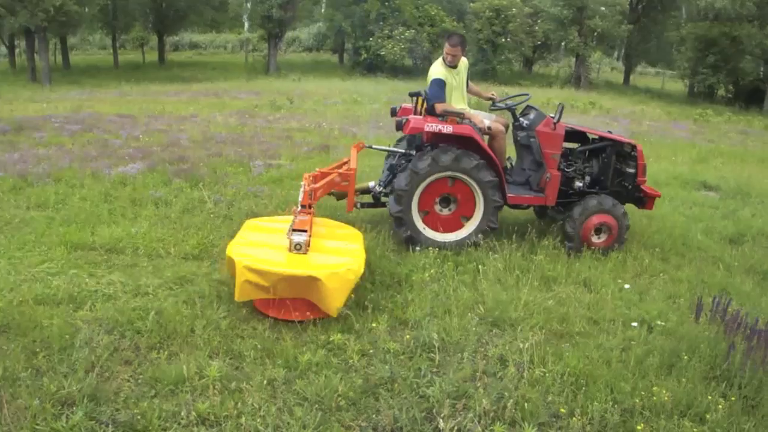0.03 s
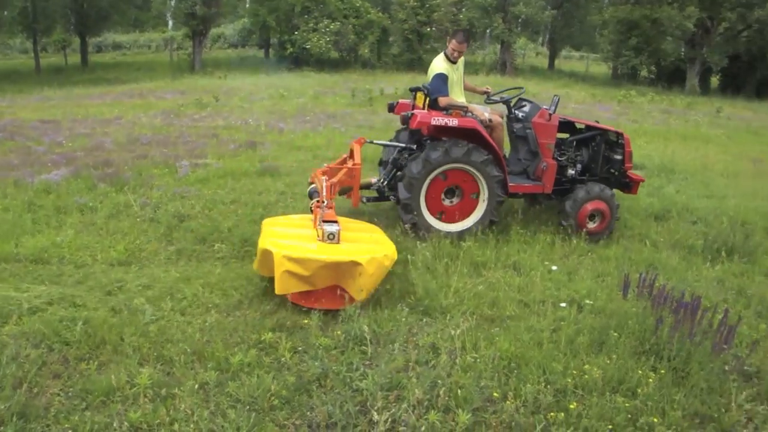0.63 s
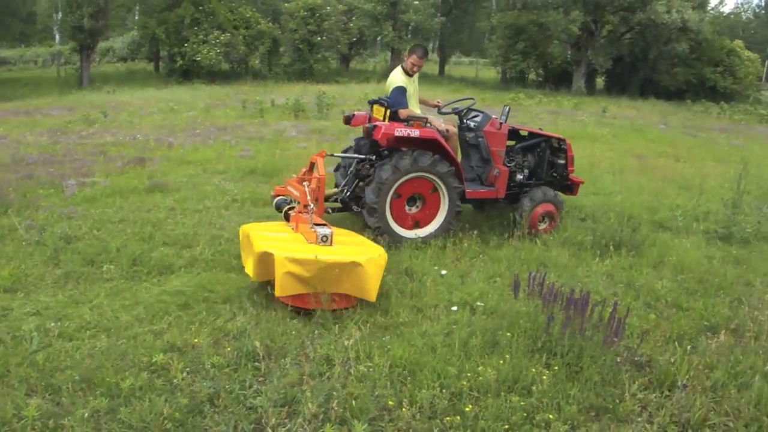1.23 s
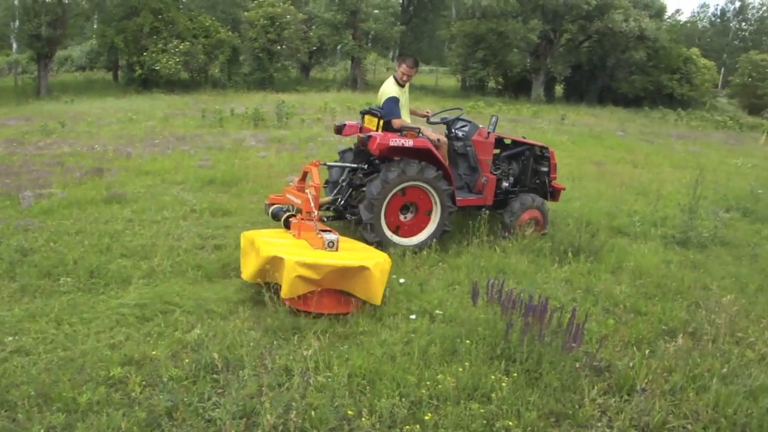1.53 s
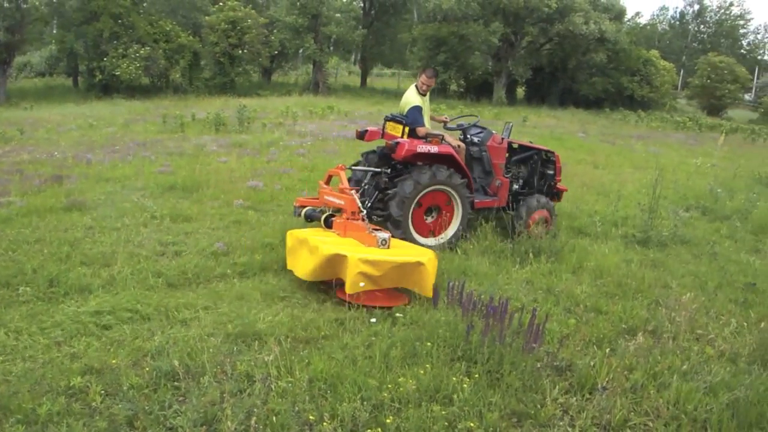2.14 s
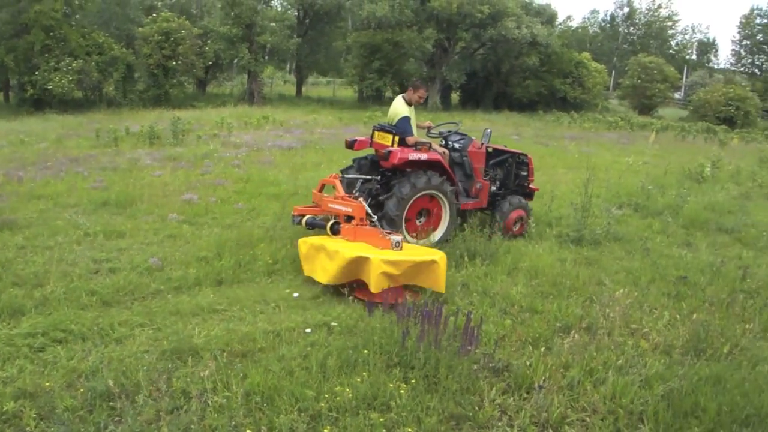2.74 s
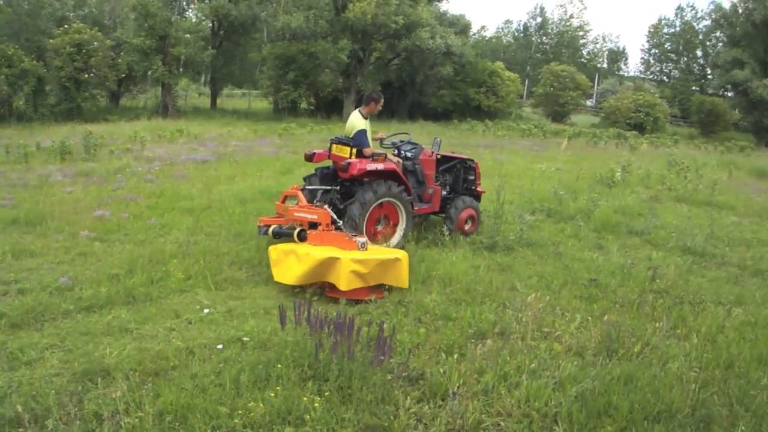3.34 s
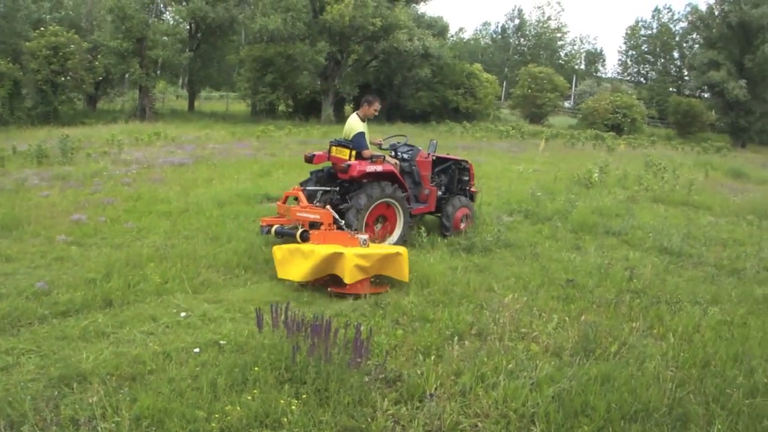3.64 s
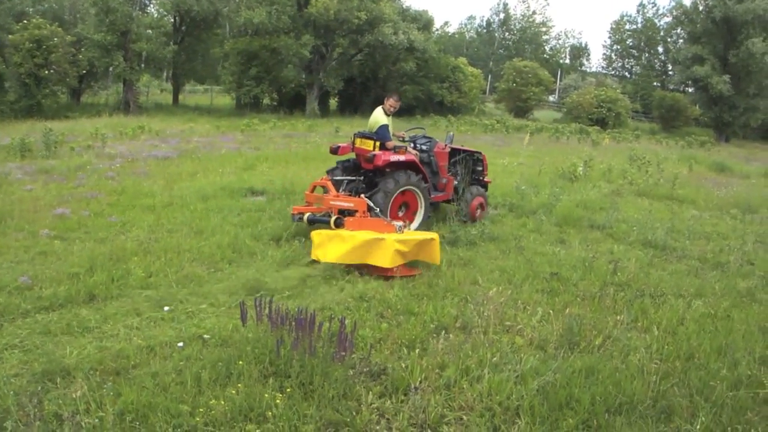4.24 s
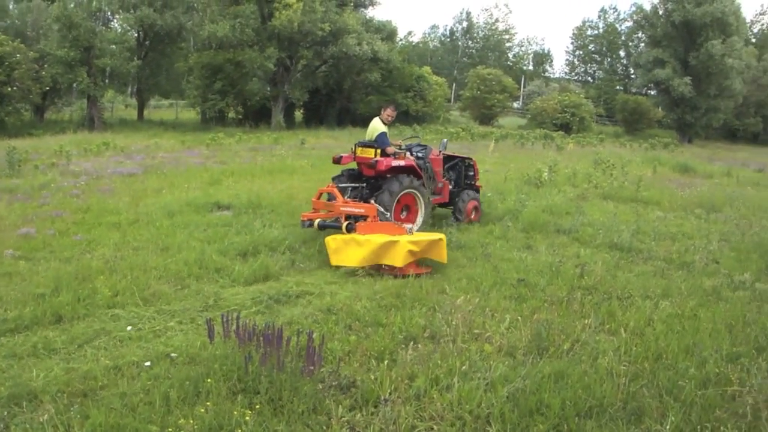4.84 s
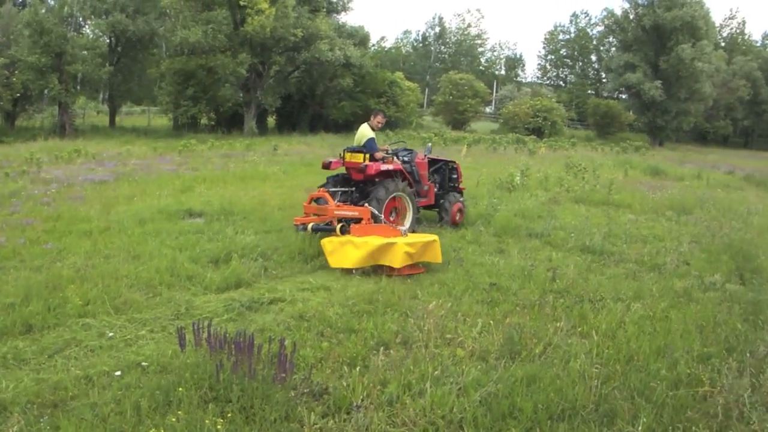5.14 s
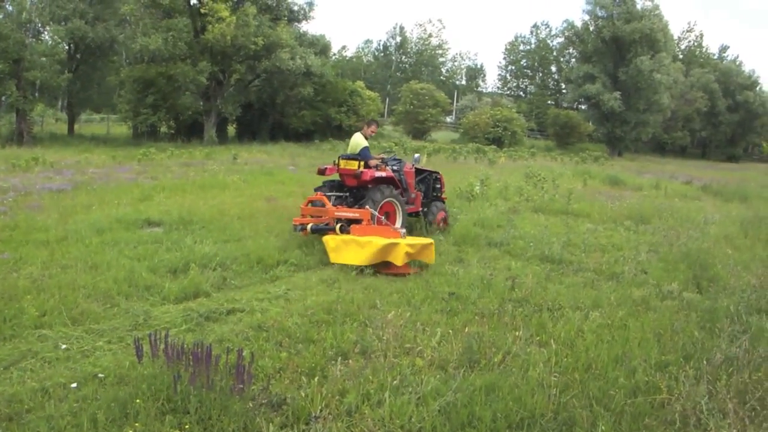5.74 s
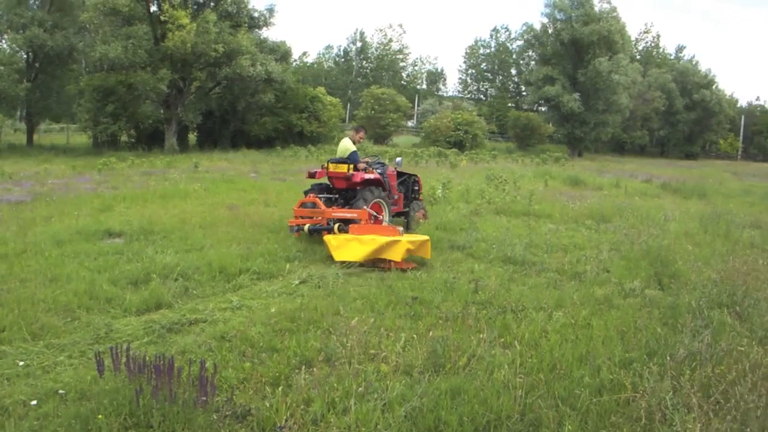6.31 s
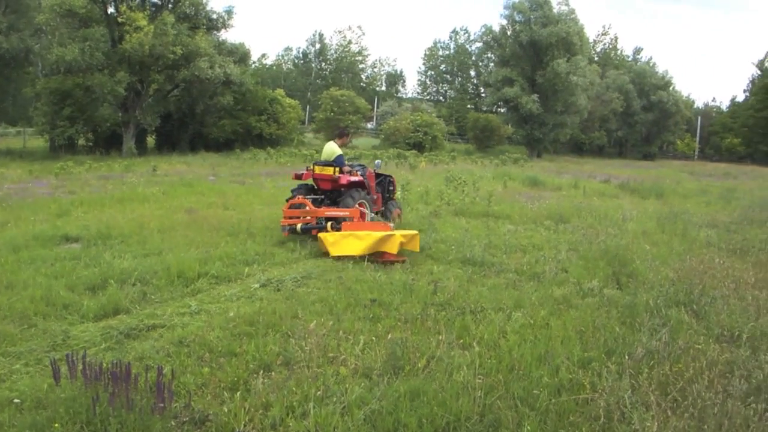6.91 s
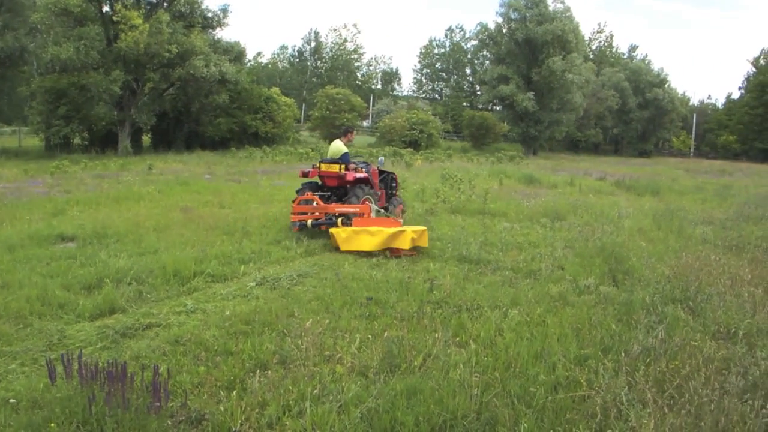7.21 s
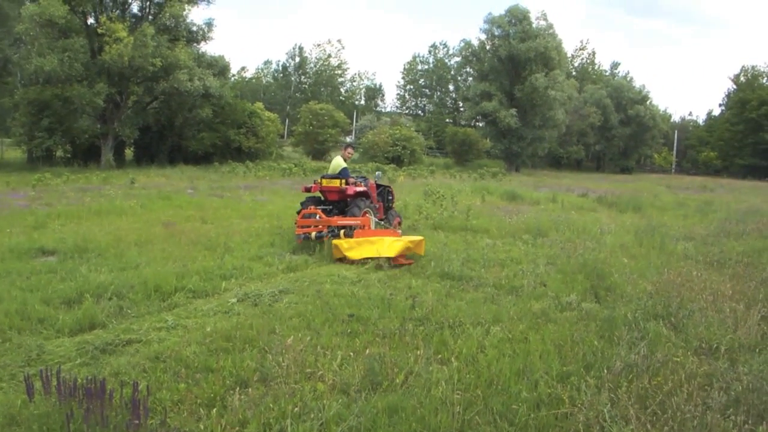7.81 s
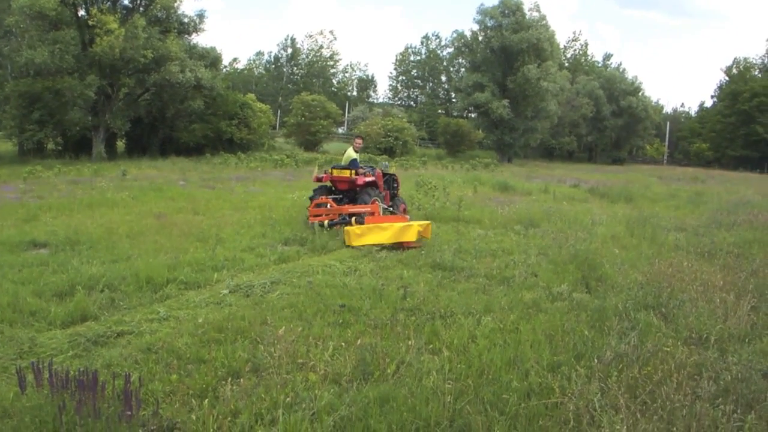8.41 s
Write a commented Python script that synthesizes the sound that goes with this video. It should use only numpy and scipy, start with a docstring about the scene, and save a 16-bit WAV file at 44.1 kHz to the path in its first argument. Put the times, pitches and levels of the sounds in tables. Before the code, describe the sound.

A small diesel tractor is heard mowing a meadow from the start, its knocking clatter holding a steady speed for about eight and a half seconds. Beneath it are a low exhaust hum, whining gears and the roar of a drum mower swishing through grass. Thick clumps add brief rasps in the first two seconds, then around 3.7, 4.5 and 6.7 seconds and from 7 to 8 seconds. Between about 1.5 and 2.3 seconds, grit strikes the blades in a cluster of tiny, sharp metallic ticks. Single faint ticks follow now and then, with a few more near 8 seconds. The engine's tone shifts as the tractor turns, at around 1.5 seconds and again at 4 seconds, where the clatter dips briefly as its rear swings toward the listener. It then recovers, and engine and mower keep running to the end.

```python
"""The clatter of a small three-cylinder diesel tractor comes first, heard side on as it mows a meadow.
Combustion knock excites the resonances of its block and panels, and the timbre shifts as it turns its
tail to the listener. Under the clatter the exhaust hums, gears whine, and a drum mower roars and shreds
grass. Thick clumps rasp and load the drive. Now and then grit sets a blade ringing, and the sharpest
of these ticks make a gain control duck."""
import sys
import numpy as np
from scipy.fft import rfft, irfft, next_fast_len
from scipy.io import wavfile
from scipy.ndimage import uniform_filter1d, map_coordinates

SR = 44100
rng = np.random.default_rng(int(sys.argv[2]) if len(sys.argv) > 2 else 0)


def persist_wave(psi):
    """Save psi, clipped to +-1, as 16-bit WAV."""
    counts = np.round(np.clip(psi, -1, 1) * 32767).astype(np.int16)
    wavfile.write(sys.argv[1], SR, np.atleast_2d(counts).T)


N = 373086

# Engine speed. Each row: time in seconds, firings per second.
FIRING_RATE = [(0, 49.16), (2.7, 49.1), (4.3, 48.8), (5.4, 48.8), (6.2, 49.05), (8.46, 49.05)]
# The tractor's turn. Each row: time in seconds, heading (0 side on, 1 three-quarter, 2 tail on),
# delay of the reflection from the mower deck in ms.
TURN = [(0, 0.095, 0.17), (1.2, 0.018, .19), (1.6, 1, 0.21), (3.75, 1, 0.22), (4.1, 1.82, 0.24),
        (6.5, 1.95, 0.23), (8.46, 2.01, .247)]
# Exhaust tones. Each row: harmonic number of the four-stroke cycle, relative level in dB.
EXHAUST_HARMONICS = [(3, -82), (6, -70.5), (7, -70), (8, -70), (9, -54.5), (12, -60), (15, -59),
                     (18, -57.5)]
# Gear and bearing tones. Each row: frequency in Hz, relative level in dB at headings 0, 1 and 2.
GEAR_TONES = [(252, -58, -58, -52), (369, -42.5, -42, -53), (752, -51, -49, -44), (1141, -50, -43, -39),
              (1340, -44, -42, -37.5), (1598, -50, -37.5, -55), (1674, -32, -50, -40),
              (1757, -39, -50, -50), (1940, -52, -50, -43), (2102, -39, -44, -47), (2256, -41, -36, -44),
              (2602, -44, -50, -46)]
# Brief swells of the gear tones. Each row: centre in seconds, rise in dB, half length in seconds.
GEAR_SURGES = [(.36, 5, 0.038), (0.855, 2, 0.11)]
# Modes of a struck blade. Each row: frequency in Hz, relative level in dB, 60 dB decay time in seconds.
BLADE_MODES = [(3700, -23, .01), (6840, -10, 0.0065), (8300, -8.5, 0.0058), (10050, -7.5, 0.0057),
               (14200, -0.5, 0.0011)]
# Grit striking the blades. Each row: start in seconds, relative level in dB.
GRIT_HITS = [(1.4554, -9.5), (1.5207, -12), (1.5835, -12), (1.7586, -18), (1.9685, -9.5), (2.0075, -12),
             (2.126, -13.5), (2.2615, -10), (3.2127, -19), (4.1359, -15), (4.5723, -15), (6.0615, -17),
             (6.663, -16), (7.914, -15), (8.235, -11), (8.2841, -13)]
# Thick clumps and woody stalks. Each row: centre in seconds, rasp level in dB, load in dB,
# half length in seconds.
GRASS_CLUMPS = [(.24, -32, 0.2, .078), (0.413, -40, 2.5, .04), (0.74, -28, 0, .018),
                (1.33, -25.5, -0.5, .011), (1.536, -29, 1.5, 0.016), (1.892, -38, 1.5, .03),
                (3.695, -30.5, .5, .05), (4.52, -29, 1, .025), (5.063, -20, .1, .002),
                (5.32, -34, 3, 0.062), (6.686, -27, .5, 0.031), (7.274, -31, -0.1, 0.29),
                (7.526, -28, 0, .035), (8.103, -30, .2, 0.12)]
# Resonances of block and panels. Each row: centre in Hz, width in Hz, gain in dB at headings 0, 1 and 2.
PANEL_MODES = [(481, 63, -8, -0.5, 1), (671, 80, 0, 2.5, 2.5), (854, 98, 1.5, 2.5, -7),
               (944, 76, -1.5, -8, -5), (1030, 24, -3, 2.5, 5), (1157, 77, 3.5, 5, 5.5),
               (1330, 163, 7, 6, 7), (1573, 70, 2.5, 7, -6), (1663, 67, 11, 5, 4), (1880, 83, 1.5, -3, 3),
               (2074, 160, 4, 4.5, -0.5), (2270, 130, 3.5, 4, -1), (2560, 530, 6.5, 2.5, 1),
               (3190, 230, 1.5, 3.5, 5.5)]
# Spectra of the five noises. Each row: frequency in Hz, relative spectral density in dB.
RASP_SPECTRUM = [(1500, -20.5), (2800, -4), (3150, 6.5), (3400, 2), (3700, 6), (4500, -7.5), (6000, -24),
                 (11000, -30)]
SWISH_SPECTRUM = [(1000, -29), (2500, -2.5), (3700, 3), (5200, 0), (7000, -4.5), (8300, -2.5), (9100, -7.5),
                  (10500, -1.5), (14000, -63)]
SNAP_SPECTRUM = [(2000, -32), (5000, 1.5), (7000, 1.5), (8300, 7.5), (9300, 5), (10500, 0), (14000, 1.5)]
ROAR_SPECTRUM = [(25, -70), (55, -44), (80, -46), (130, -19), (200, -12.5), (290, -6), (400, -3.5),
                 (620, 0.5), (950, 2.5), (1400, -7.5), (3000, -23), (8000, -53)]
KNOCK_SPECTRUM = [(300, -69), (800, -7.5), (1250, -3), (1900, 1), (2600, -2.5), (2950, -6.5), (4000, -10),
                  (6000, -21.5), (11000, -27.5)]
# Slow swells of the cutting and of the turning engine. Each row: time in seconds, relative level in dB.
CUTTING_SWELL = [(0.2, -31), (0.65, -31.5), (1.1, -32.0), (3.15, -33.0), (3.65, -30.0), (4.05, -30.5),
                 (4.4, -33.0), (5.5, -31.0), (6.3, -32.5), (7.1, -33), (7.45, -29.5), (8.44, -33.5)]
ENGINE_SWELL = [(0.2, -22), (0.85, -22), (1.5, -23.5), (2.4, -24.5), (3.1, -22.5), (3.8, -24.0),
                (4.2, -28.5), (4.7, -25.5), (5.05, -26), (6.3, -25), (6.8, -24), (7.65, -24.5), (8.05, -23),
                (8.44, -23.5)]

EXHAUST_TRIM_DB, ROAR_BASE_DB = (-2.5, -3, 0), (-31, -29.5, -29)  # at headings 0, 1 and 2
PATCHY_DB, PATCHY_PER_S = 0.55, 7  # patchy grass varies the load
CLATTER_PER_LOAD, ROAR_PER_LOAD, CUT_PER_LOAD = 0.79, 0.92, 0.82  # dB for each dB of load
ROAR_PER_SWELL, WHINE_PER_SWELL = 0.66, 0.3  # dB for each dB of the engine's swell


def amp(db):
    """Amplitude grows tenfold for every 20 dB."""
    return 10 ** (np.asarray(db) / 20)


def unit(x):
    """Normalisation to an rms of 1."""
    return x / np.sqrt(np.mean(x ** 2) + 1e-20)


def seconds():
    """The instants of uniform sampling."""
    return np.arange(N) / SR


def curves(rows):
    """Linear interpolation in time of each column after the first."""
    times, *columns = np.transpose(rows)
    return [np.interp(seconds(), times, column) for column in columns]


def bump(centre_s, half_s):
    """A Gaussian pulse of height 1."""
    return np.exp(-((seconds() - centre_s) / half_s) ** 2)


def wobble(per_s):
    """Slow noise of rms 1: a spline through per_s random values a second."""
    knots = rng.standard_normal(int(N * per_s / SR) + 4)
    return unit(map_coordinates(knots, [seconds() * per_s], mode="nearest"))


def throb(turns, depth_db):
    """Periodic amplitude modulation: a gain of rms 1 that swells once a turn."""
    return unit(amp(depth_db * np.cos(2 * np.pi * turns)))


def filtered(x, response):
    """Linear filtering multiplies the spectrum by a frequency response."""
    size = next_fast_len(N + 8192)
    return irfft(rfft(x, size) * response(np.fft.rfftfreq(size, 1 / SR)), size)[..., :N]


def coloured(x, spectrum):
    """Spectral shaping through (Hz, dB) points, at rms 1."""
    points_hz, db = np.transpose(spectrum)
    return unit(filtered(x, lambda hz: amp(np.interp(np.log(hz + 1), np.log(points_hz), db))))


def cyclic_noise(cycles, share, size=2700):
    """Partly periodic noise: a share of its power repeats in every engine cycle."""
    periodic = map_coordinates(rng.standard_normal(size), [cycles % 1 * size], mode="grid-wrap")
    return np.sqrt(share) * unit(periodic) + np.sqrt(1 - share) * rng.standard_normal(N)


def radiated(x, heading):
    """Directivity: different resonant panels face the listener as the tractor turns."""
    out = np.zeros(N)
    for view in range(3):
        resonances = lambda hz: amp(sum(dbs[view] * .5 ** ((2 * (hz - centre) / width) ** 2)
                                        for centre, width, *dbs in PANEL_MODES))
        facing = np.clip(1 - abs(np.clip(heading, 0, 2) - view), 0, 1)
        out += np.sqrt(facing) * unit(filtered(x, resonances))
    return unit(out)


def exhaust(cycles, heading, waver_db):
    """A periodic firing pattern radiates harmonics, loudest with the tail to the listener."""
    tones = sum(amp(db + waver_db * wobble(5)) * np.sin(2 * np.pi * (harmonic * cycles + rng.random()))
                for harmonic, db in EXHAUST_HARMONICS)
    return amp(np.interp(heading, range(3), EXHAUST_TRIM_DB)) * np.sqrt(2) * tones


def gearbox(firings, heading, backlash_per_khz, flutter_per_s):
    """Meshing gears sound tones in step with the engine; backlash modulates the high ones most."""
    shaft_s = firings / firings[-1] * N / SR  # a clock that runs with the engine
    out = np.zeros(N)
    for hz, *dbs in GEAR_TONES:
        loose = np.clip(backlash_per_khz * hz / 1000, 0, 1)
        jitter = wobble(flutter_per_s) + 1j * wobble(flutter_per_s)
        flutter = np.sqrt(1 - loose) + np.sqrt(loose / 2) * jitter
        tone = np.real(flutter * np.exp(2j * np.pi * hz * shaft_s))
        out += amp(np.interp(heading, range(3), dbs)) * tone
    return np.sqrt(2) * out


def grit(gain_db):
    """An impact of grit excites a blade's modes, which decay within milliseconds."""
    out, t = np.zeros(N + SR), np.arange(SR // 50) / SR
    ring = sum(amp(db - 60 * t / t60) * np.sin(2 * np.pi * hz * t) for hz, db, t60 in BLADE_MODES)
    ping = np.diff(ring, prepend=0)  # a small blade radiates no bass
    for start_s, db in GRIT_HITS:
        out[round(start_s * SR):][:len(t)] += amp(db + gain_db) * ping
    return out[:N]


def clumps():
    """Friction of thick clumps on the steel drums gives bursts of rasping noise."""
    envelope = sum(amp(db) * bump(centre_s, half_s) for centre_s, db, _, half_s in GRASS_CLUMPS)
    return envelope * coloured(rng.standard_normal(N), RASP_SPECTRUM)


def cutting(blade_passes, lag_ms, stalks_per_s, spread_db, reflection):
    """Blades swish through tufts; stalks fracture as random impulses, stronger at each blade pass."""
    tufts_db = 0.86 * wobble(22)
    air = rng.standard_normal(N) * throb(blade_passes, depth_db=-0.2)
    swish = coloured(air * amp(tufts_db + 1.2 * wobble(250)), SWISH_SPECTRUM)
    snaps = (rng.random(N) < stalks_per_s / SR) * rng.choice([-1, 1], N)
    sizes = amp(spread_db * np.minimum(rng.exponential(size=N), 4))
    force = throb(blade_passes, depth_db=4.0) * amp(tufts_db + 1.45 * wobble(12))
    grass = swish + amp(-7.0) * coloured(snaps * sizes * force, SNAP_SPECTRUM)
    # the deck's reflection forms a comb filter, which slides down as the mower turns
    delayed = map_coordinates(grass, [np.arange(N) - lag_ms * SR / 1000], mode="nearest")
    return unit(grass + reflection * delayed)


def roar(cycles, heading):
    """Turbulence in the exhaust and in the air churned by the drums radiates broadband noise."""
    air = cyclic_noise(cycles, share=0.15) * amp(0.24 * wobble(25))
    return radiated(coloured(air, ROAR_SPECTRUM), heading)


def clatter(cycles, firings, heading):
    """Combustion knock and valve gear drive the block into noisy forced vibration."""
    knocks = cyclic_noise(cycles, share=0.14) * throb(firings, depth_db=0.1) * amp(0.56 * wobble(130))
    return radiated(coloured(knocks, KNOCK_SPECTRUM), heading)


def levels(heading):
    """Gains add in dB: slow swells, plus surges for the gears and the grass load for the rest."""
    engine_db, = curves(ENGINE_SWELL)
    grass_db, = curves(CUTTING_SWELL)
    swell_db = engine_db - engine_db.mean()
    surge_db = sum(db * bump(centre_s, half_s) for centre_s, db, half_s in GEAR_SURGES)
    clump_db = sum(db * bump(centre_s, half_s) for centre_s, _, db, half_s in GRASS_CLUMPS)
    load_db = PATCHY_DB * wobble(PATCHY_PER_S) + clump_db
    whine_db = WHINE_PER_SWELL * swell_db + surge_db - 0.3
    cut_db = grass_db + CUT_PER_LOAD * load_db + 3.0
    roar_db = np.interp(heading, range(3), ROAR_BASE_DB) + ROAR_PER_SWELL * swell_db
    roar_db += ROAR_PER_LOAD * load_db
    clatter_db = engine_db + CLATTER_PER_LOAD * load_db + 0.3
    return whine_db, cut_db, roar_db, clatter_db


def scene():
    """Superposition of engine and mower, driven by one crankshaft and alike in both channels."""
    heading, lag_ms = curves(TURN)
    whine_db, cut_db, roar_db, clatter_db = levels(heading)
    firing_hz, = curves(FIRING_RATE)
    firings = np.cumsum(firing_hz * (1 + 0.001203 * wobble(4))) / SR
    cycles = firings / 3  # three cylinders fire in each four-stroke cycle
    blade_passes = 6.17 * cycles
    mix = exhaust(cycles, heading, waver_db=1.4)
    mix += amp(clatter_db) * clatter(cycles, firings, heading)
    mix += amp(roar_db) * roar(cycles, heading)
    mix += amp(whine_db) * gearbox(firings, heading, backlash_per_khz=0.45, flutter_per_s=30)
    mix += amp(cut_db) * cutting(blade_passes, lag_ms, stalks_per_s=1000, spread_db=4.5, reflection=0.25)
    mix += clumps() + grit(gain_db=2.0)
    return np.tile(mix, (2, 1))


def gain_control(x, ceiling_db, release_db_per_s):
    """Peak limiting: a peak over the ceiling pulls the gain down at once, and it creeps back."""
    peak_db = 20 * np.log10(abs(x).max(axis=0) + 1e-9)
    over_db = np.maximum(peak_db - ceiling_db, 0)
    ramp_db = release_db_per_s * seconds()
    duck_db = np.maximum.accumulate(over_db + ramp_db) - ramp_db
    return x * amp(-uniform_filter1d(duck_db, size=44))  # smoothed over 1 ms


def record(dry):
    """Peak limiting, a quick fade-in and a Butterworth band-pass shape the whole sound."""
    low_hz, top_hz = 42, 11020
    band = lambda hz: (1 + (low_hz / (hz + 1)) ** 8) ** -.5 * (1 + (hz / top_hz) ** 220) ** -.5
    fade_in = np.interp(seconds(), [.086, .185], [0, 1])
    limited = gain_control(dry, ceiling_db=-6.5, release_db_per_s=40)
    return filtered(fade_in * limited, band)


dry = scene()
out = record(dry)
persist_wave(out)
```